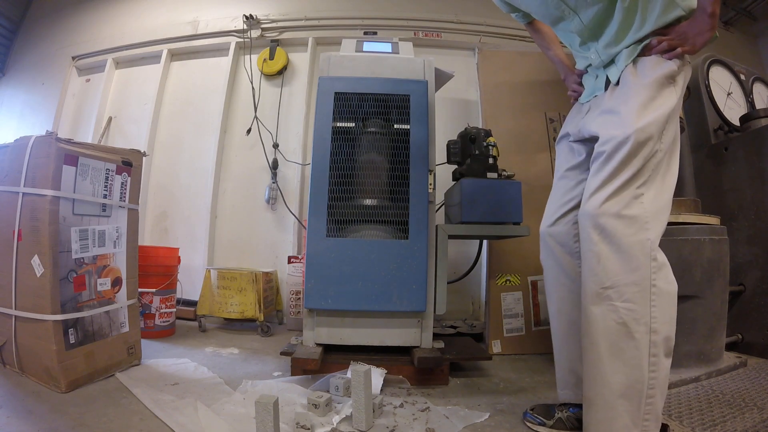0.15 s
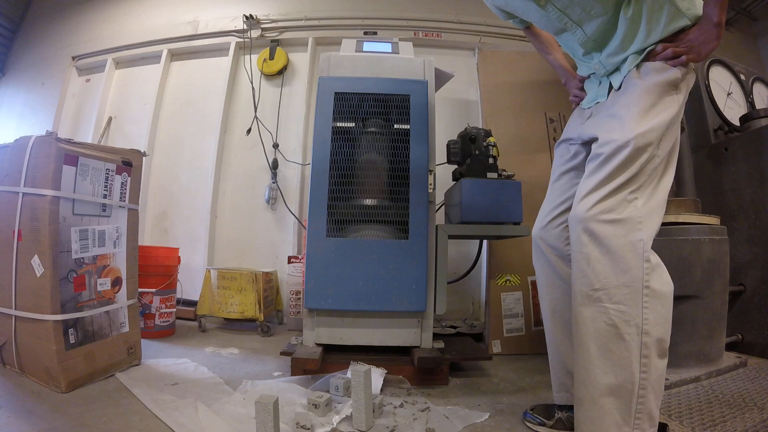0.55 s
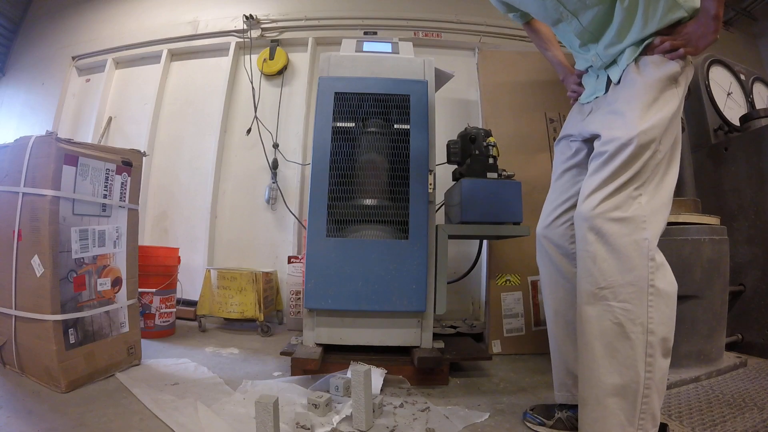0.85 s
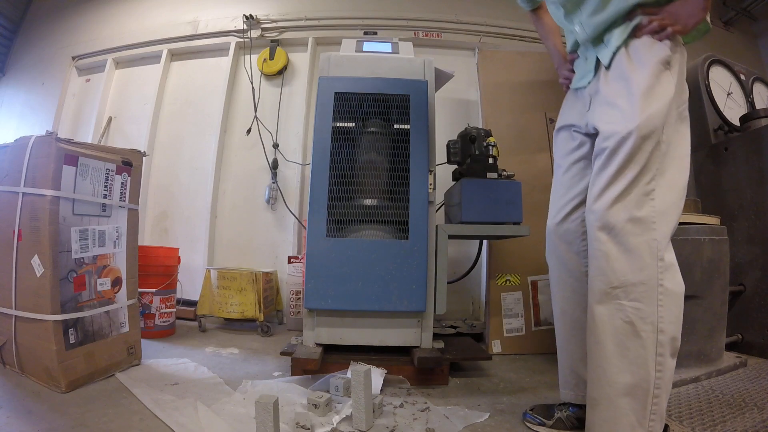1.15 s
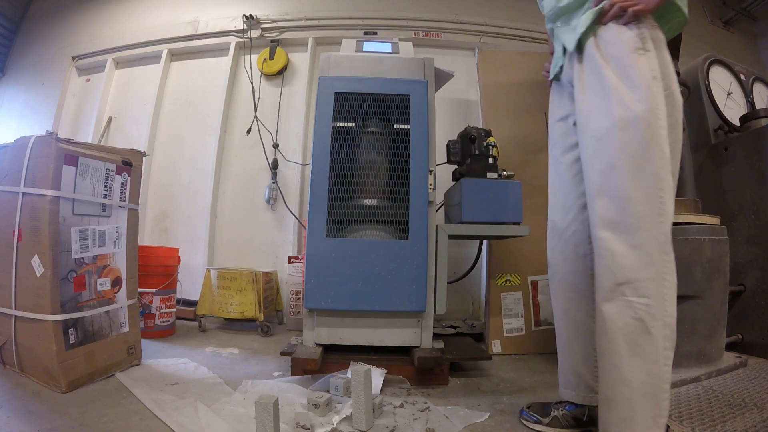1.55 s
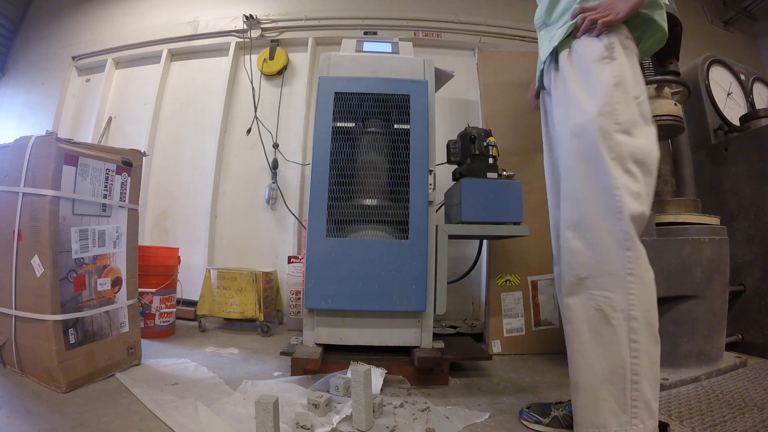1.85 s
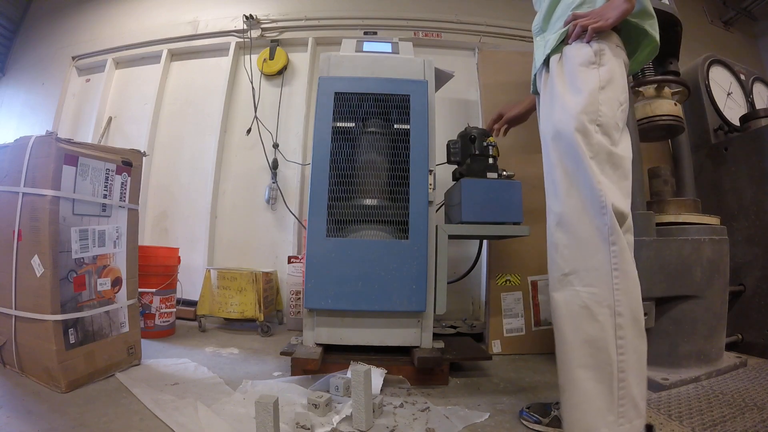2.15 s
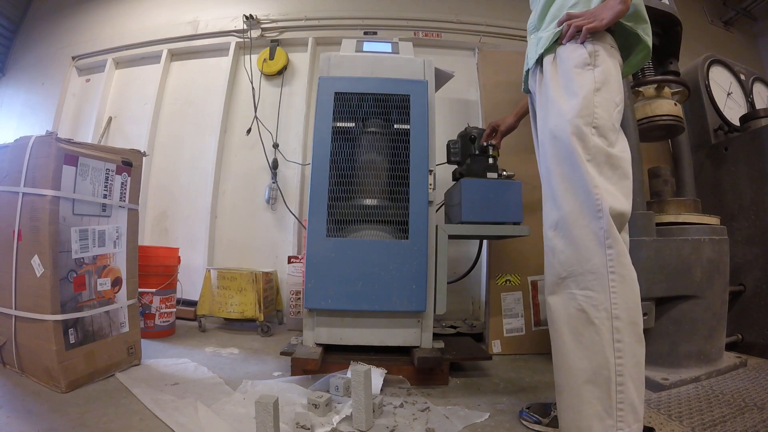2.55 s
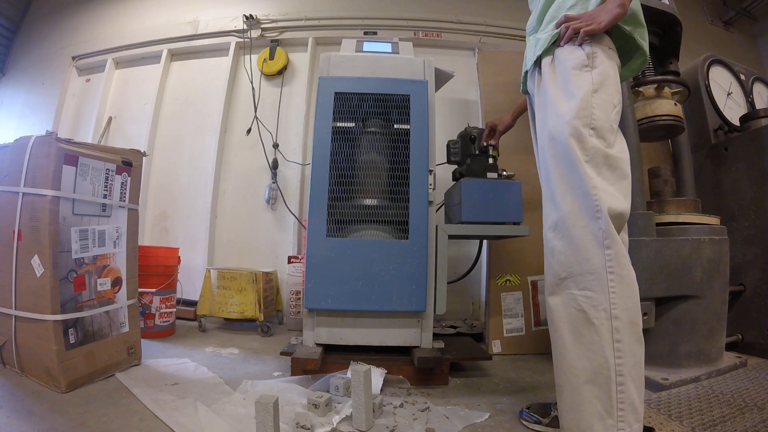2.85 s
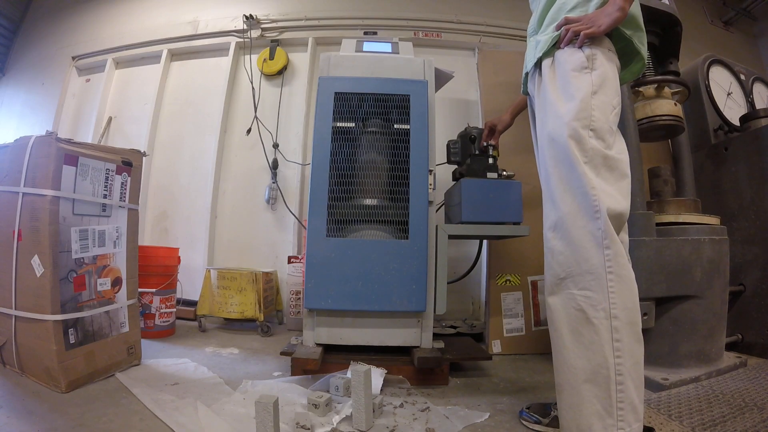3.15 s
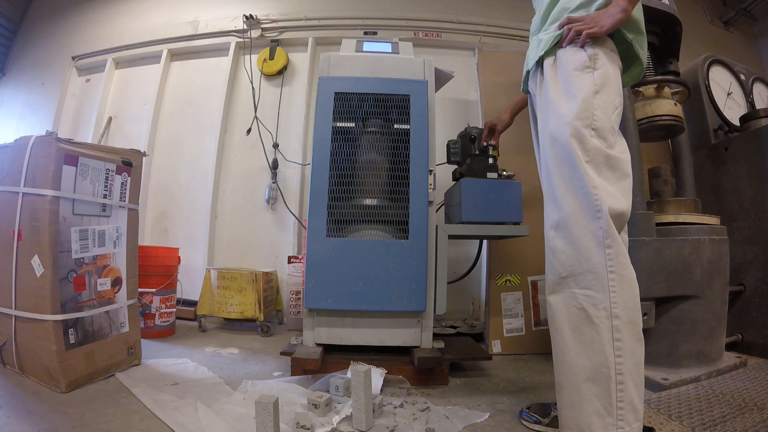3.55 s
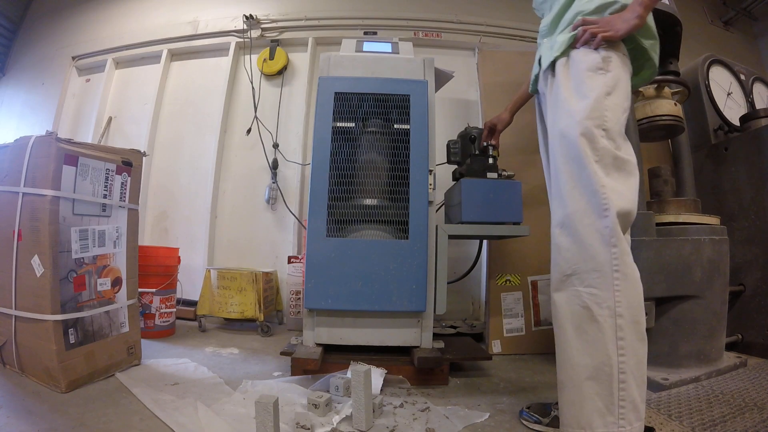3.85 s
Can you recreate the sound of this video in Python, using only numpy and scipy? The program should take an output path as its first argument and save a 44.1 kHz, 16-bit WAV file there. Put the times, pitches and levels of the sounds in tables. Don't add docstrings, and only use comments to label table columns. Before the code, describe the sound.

A concrete cylinder breaks with a sudden loud crack near three seconds, after a steady machine hum. Steel booms, chips rattle on the mesh cage, chunks thud and grit settles, heard through a closed plastic case.

```python
import sys
import numpy as np
from scipy import signal
from scipy.fft import rfft, irfft, next_fast_len
from scipy.io import wavfile
from scipy.ndimage import uniform_filter1d, map_coordinates

SR = 44100
rng = np.random.default_rng(int(sys.argv[2]) if len(sys.argv) > 2 else 0)


def nominal_scale(level):
    x = np.asarray(level, float) / 20
    return 10 ** x


def store_wav(level_fs):
    pcm = np.round(np.clip(np.atleast_2d(level_fs), -1, 1) * 32767)
    wavfile.write(sys.argv[1], SR, pcm.T.astype(np.int16))


N = 176400

# (shaft order, level [dB])
PUMP_ORDERS = [(6, -58.9), (9, -71.1), (10, -72.6), (11, -60.9), (12, -36.1), (13, -48.5), (14, -60.2),
               (15, -74.9), (16, -63.9), (17, -73.9), (18, -65.2), (19, -72.3), (20, -76.1), (22, -80.3),
               (23, -69.6), (24, -56.1), (25, -78.2), (26, -66.3), (27, -78.1), (28, -75.7), (29, -71.0),
               (30, -49.8), (31, -70.2), (32, -68.3), (33, -70.5), (34, -64.9), (35, -64.7), (36, -52.2),
               (37, -64.0), (38, -58.7), (21, -76),
               (39, -62), (40, -57.5), (41, -56.5), (42, -68), (43, -67), (44, -74), (45, -67), (46, -73),
                (47, -74.5), (48, -72.5), (54, -73), (62, -76.5), (65, -77.5), (66, -77.5), (67, -81),
                (69, -78.5), (71, -83.5), (72, -83.5), (78, -81.5), (84, -79), (96, -80), (100, -79.5),
                (101, -79), (102, -80.5), (103, -81), (104, -82), (106, -84.5), (112, -84), (114, -89.5),
                (116, -80)]
ORDERS = [(round(order), db) for order, db in PUMP_ORDERS]
# (time [s], level [dB])
STANDING_WAVE = [(0, 1.5), (1.0, 1.5), (1.6, -1), (2.2, -3), (2.95, -4), (3.3, -3), (4, -2)]
STANDING_WAVE_SHARE = {11: .5, 12: 1, 13: .7, 30: .7, 36: -.3, 40: -.6}
# (frequency [Hz], level [dB])
WEAK_ORDERS = [(30, -77.5), (600, -82), (1200, -73.5), (1600, -94.5), (2600, -92), (4000, -99),
               (9000, -103), (13000, -115)]
# (frequency [Hz], level [dB])
MAINS = [(119.95, -55), (239.9, -52.5)]
# (frequency [Hz], level [dB per Hz])
AIR = [(40, -0.5), (150, -13), (480, -14), (650, -21), (1150, -16.5), (1600, -26.5), (4000, -36.5),
       (13000, -48)]
# (frequency [Hz], width [Hz], level [dB])
DUCT = [(40, 14, -1.5)]
# (frequency [Hz], level [dB], 60 dB decay [s])
VALVE = [(3160, -56, 0.028), (3440, -51, 0.027)]
# (frequency [Hz], level [dB], 60 dB decay [s])
FRAME = [(59, -11, 0.17), (99, -6.5, 0.1), (222, -1.5, 0.093), (295, -7.5, 0.12), (371, 5, 0.046),
         (557.5, -12, 0.25), (660, 3.5, 0.06), (840, 2, 0.067), (1036, -5, 0.11), (1150, 2, 0.047)]
# (frequency [Hz], level [dB], 60 dB decay [s])
PLATEN_PING = [(4480, -50, .2), (13000, -46, .16), (13030, -52, .2)]
# (frequency [Hz], level [dB per Hz])
GRIT = [(40, -28.5), (200, 0), (450, -3), (750, -5.5), (1200, -8), (1600, -14), (2800, -24), (13500, -31.5)]
# (time [s], level [dB])
SPRAY = [
    (2.988, -25.5),
    (3.04, -27),
    (3.15, -23),
    (3.24, -25.5),
    (3.3, -36.5),
    (3.45, -40.5),
    (3.6, -43),
    (3.78, -57),
    (4, -81),
]
# (frequency [Hz], width [Hz], level [dB])
MESH = [(843, 25, 6.5), (1100, 130, 3), (1170, 97, 5.5), (1730, 120, 0.5), (1980, 160, -1.5),
        (3300, 660, -2.5), (4490, 400, -4.5), (13200, 300, 0.5)]
# (frequency [Hz], width [Hz], level [dB])
SILL = [(561, 33, 5), (1032, 55, 8.5), (1130, 54, 8), (1233, 45, 7), (1280, 53, 5.5), (1386, 79, 3.5),
        (1900, 420, 2.5), (3300, 960, 0), (4540, 630, -1.5), (7700, 740, -6)]
# (frequency [Hz], width [Hz], depth [0-1], duration [s])
DULL_DUST = (9100, 2200, 0.82, 0.048)
# (time [s], level [dB], hardness [0-1], main mode [Hz])
THUDS = [
    (2.999, -15.5, 0.96, 210.1),
    (3.007, -11, 0.93, 204),
    (3.063, -12.5, 0.79, 208.2),
    (3.086, -27, 1, 214.4),
    (3.106, -29, 1, 211),
    (3.177, -16.5, 0.08, 207.5),
    (3.207, -18, 0.03, 211.5),
    (3.259, -28, 0.02, 199),
    (3.293, -27, 0.3, 212),
    (3.361, -38, 0.8, 208),
]
# (frequency [Hz], level [dB], 60 dB decay [s])
PLATEN = [(97.6, -25, 0.16), (176, -15, 0.13), (215, -0.5, 0.15), (231, -11.5, 0.15), (315.3, -1.5, 0.14),
          (579, -9.5, 0.13), (796, -5.5, 0.046), (1070, -30, 0.065)]
# (time [s], level [dB])
BOOMS = [
    (3.166, -38.5),
    (3.366, -38.5),
    (3.418, -51),
    (3.553, -51),
]
# (frequency [Hz], level [dB], 60 dB decay [s])
PAN = [(46.6, 2, 0.21), (73.5, 1, .2), (100.2, 10.5, 0.22), (116.5, -2, 0.15)]
# (time [s], level [dB])
TICKS = [
    (3.445, -53),
    (3.555, -52),
    (3.601, -54),
    (3.64, -52),
]
# (frequency [Hz], 60 dB decay [s])
ROOM = [(60, 1), (300, 0.61), (1500, 0.93), (6000, 0.53), (13000, 0.41)]
# (frequency [Hz], width [Hz], level [dB])
CASE = [(3335, 316, 3), (5070, 1450, -2), (6400, 550, -9), (7570, 870, -3.5), (13500, 320, -3)]
# (frequency [Hz], threshold [standard deviations])
TREBLE_LOSS = [(8500, -3), (10000, -.5), (11000, .1), (12600, .1), (13000, 1.8), (13700, 3.2)]

SHAFT_HZ, FREED_HZ, FREED_S = 29.6, .08, .15
PISTONS, LOOSE_TURNS, LOOSE_DB, LOOSE_PER_S = 6, .1, 1.4, 8
SWAY_DB, SWAYS_PER_S = -0.8, 7
WEAK_SCATTER_DB, WEAK_TOP_HZ = 3, 13800
AIR_DB = -49
TAP_S, SNAP_S = 2.297, 2.9877
SNAP_DB, SNAP_RISE_S = -12, .0006
FLIP_HZ = 450
LATE_HZ, LATE_S = 800, .009
PULL_DB, PULL_S = -12, .0011
CRACK_DB, CRACK_S = -47.5, .15
CLICK_DB, CLICK_S = -39, .01
CHIPS_PER_S, CHIP_SPREAD_DB = 2200, 2
CHIP_HZ, CHIP_OCTAVES, CHIP_CYCLES, CHIP_SHARE = 3500, 1.3, 30, .5
FALL_S, FALL_SPAN_S = 3.16, 0.035
PLATEN_HZ, HARD_HZ = 213, 260
WET_DB = -6
LOW_CUT_HZ, ROLL_HZ = 18, 13700
RESCUE_DB, RESCUE_SLOPE = 21, .24


def unit(x):
    return x / np.sqrt(np.mean(x ** 2) + 1e-20)


def along(points, hz):
    f, value = np.transpose(points)
    return np.interp(np.log(hz + 1), np.log(f + 1), value)


def curve(rows):
    return np.interp(np.arange(N) / SR, *np.transpose(rows))


def wobble(rate):
    return map_coordinates(rng.standard_normal(200), [np.arange(N) * min(rate, 45) / SR])


def filtered(x, response):
    size = next_fast_len(N + SR // 2)
    return irfft(rfft(x, size) * response(np.fft.rfftfreq(size, 1 / SR)), size)[..., :N]


def peaks(table):
    return lambda f: 1 + sum(nominal_scale(db) * 1j * f * width / (hz * hz - f * f + 1j * f * width)
                             for hz, width, db in table)


def add(x, s, sound):
    i = round(s * SR)
    x[i:i + len(sound)] += sound[:N - i]


def ring(modes, attack_s, gain=lambda hz: 1, scatter_db=2):
    t = np.arange(SR // 2) / SR
    total = np.zeros(len(t))
    for hz, db, t60 in modes:
        fade = nominal_scale(db + scatter_db * rng.standard_normal() - 60 * t / t60)
        total += gain(hz) * fade * np.sin(2 * np.pi * hz * t)
    return total * (1 - np.exp(-t / attack_s)) ** 2


def noise_burst(db, t60, rise_s=0):
    t = np.arange(SR // 10) / SR
    rise = np.minimum(t / rise_s, 1) if rise_s else 1
    return nominal_scale(db - 60 * t / t60) * rise * rng.standard_normal(len(t))


def stone_colour(x):
    return filtered(x, lambda f: nominal_scale(along(GRIT, f) + 24))


def strong_tones(turns):
    total, standing_db = np.zeros(N), curve(STANDING_WAVE)
    for order, db in ORDERS:
        loose = order % PISTONS > 0
        sway_share = 0.38 if order == 12 else 1
        sway_db = SWAY_DB * wobble(SWAYS_PER_S) * sway_share
        level_db = db + sway_db + standing_db * STANDING_WAVE_SHARE.get(order, 0)
        level_db = level_db + LOOSE_DB * wobble(LOOSE_PER_S) * loose
        drift = (rng.random() + LOOSE_TURNS * wobble(LOOSE_PER_S)) * loose
        total += nominal_scale(level_db) * np.sin(2 * np.pi * (order * turns + drift))
    return total


def weak_tones(turns):
    size = 4096
    order = np.arange(size // 2 + 1)
    hz = order * SHAFT_HZ
    level = nominal_scale(along(WEAK_ORDERS, hz) + WEAK_SCATTER_DB * rng.standard_normal(len(order)))
    level = level * (hz < WEAK_TOP_HZ) * (order > 0)
    level[[k for k, _ in ORDERS]] = 0
    phase = np.exp(2j * np.pi * rng.random((3, len(order))))
    shapes = irfft(level * phase, size) * size / 2
    play = [np.interp(turns % 1 * size, np.arange(size), s, period=size) for s in shapes]
    return play[0] + 0.36 * (wobble(0.65) * play[1] + wobble(1.3) * play[2])


def pump():
    freed = np.clip((np.arange(N) / SR - SNAP_S) / FREED_S, 0, 1)
    turns = np.cumsum(SHAFT_HZ + FREED_HZ * freed + 0.0041 * wobble(3)) / SR
    return np.sqrt(2) * (strong_tones(turns) + weak_tones(turns))


def mains_buzz():
    t = np.arange(N) / SR
    return np.sqrt(2) * sum(nominal_scale(db + 0.44 * wobble(7.1)) * np.sin(2 * np.pi * (hz * t + rng.random()))
                            for hz, db in MAINS)


def air():
    noise = filtered(rng.standard_normal(N), lambda f: nominal_scale(along(AIR, f)) * peaks(DUCT)(f))
    return nominal_scale(AIR_DB + 0.16 * wobble(3.4)) * unit(noise)


def valve_tap():
    x = np.zeros(N)
    add(x, TAP_S, ring(VALVE, 0.0011))
    return x


def snap():
    x, crack = np.zeros(N), np.zeros(N)
    add(x, SNAP_S - PULL_S / 2, -nominal_scale(PULL_DB) * np.hanning(round(2 * PULL_S * SR)))
    low = [mode for mode in FRAME if mode[0] < LATE_HZ]
    high = [mode for mode in FRAME if mode[0] >= LATE_HZ]
    low_ring = ring(low, SNAP_RISE_S, lambda hz: np.sign(FLIP_HZ - hz), scatter_db=0)
    add(x, SNAP_S, nominal_scale(SNAP_DB) * low_ring)
    add(x, SNAP_S + LATE_S, nominal_scale(SNAP_DB) * ring(high, .002, scatter_db=0))
    add(x, SNAP_S + LATE_S, ring(PLATEN_PING, .003, scatter_db=0))
    add(crack, SNAP_S, noise_burst(CRACK_DB, CRACK_S, rise_s=.002))
    add(crack, SNAP_S, noise_burst(CLICK_DB, CLICK_S, rise_s=.001))
    return x + stone_colour(crack)


def chips():
    draw = rng.random((round(CHIPS_PER_S * (N / SR - 2.98)), 4))
    start = (SNAP_S * SR + draw[:, 0] * (N - SNAP_S * SR)).astype(int)
    octaves = CHIP_OCTAVES * 2 * (draw[:, 1] + draw[:, 2] - 1)
    hz = np.clip(CHIP_HZ * 2 ** octaves, 300, 13500)[:, None]
    n = np.arange(600)
    cycles = n * hz / SR
    size_db = -CHIP_SPREAD_DB * np.log(draw[:, 3:] + 1e-3)
    fade = nominal_scale(size_db - 60 * cycles / CHIP_CYCLES / 2)
    tone = fade * np.sqrt(hz) * np.minimum(cycles / 3, 1) * np.sin(2 * np.pi * cycles)
    x = np.bincount((start[:, None] + n).ravel(), tone.ravel(), N + len(n))[:N]
    return x / np.std(x[start.min():])


def spray():
    t = np.arange(N) / SR
    drive = CHIP_SHARE * chips() + rng.standard_normal(N)
    after = t > SNAP_S
    lumpy = drive * nominal_scale(curve(SPRAY) + .9 * wobble(40)) * after

    def on_cage(x, table):
        return filtered(x, lambda f: nominal_scale(along(GRIT, f)) * peaks(table)(f))

    fallen = np.pi / 4 * (1 + np.tanh((t - FALL_S) / FALL_SPAN_S))
    x = np.cos(fallen) ** 2 * on_cage(lumpy, MESH) + np.sin(fallen) ** 2 * on_cage(lumpy, SILL)
    x = x / np.std(on_cage(drive, SILL)[after])
    centre_hz, width_hz, depth, lasts_s = DULL_DUST
    early = depth * np.exp(-np.maximum(t - SNAP_S, 0) ** 2 / lasts_s ** 2)
    return x - early * filtered(x, lambda f: np.exp(-((f - centre_hz) / width_hz) ** 2))


def platen_thuds():
    x = np.zeros(N)
    for s, db, hard, main_hz in THUDS:
        modes = [(hz * main_hz / PLATEN_HZ, level, t60) for hz, level, t60 in PLATEN]
        blow = ring(modes, 0.0012, lambda hz: np.clip(hard if hz > HARD_HZ else 1 - hard, .03, 1))
        add(x, s, nominal_scale(db) * blow)
    return x


def pan_booms():
    x = np.zeros(N)
    for s, db in BOOMS:
        add(x, s, nominal_scale(db) * ring(PAN, 0.0025))
    return x


def stone_ticks():
    x = np.zeros(N)
    for s, db in TICKS:
        add(x, s, noise_burst(db, .008))
    return stone_colour(x)


def room(x):
    hz, t, z = signal.stft(rng.standard_normal(SR), SR, nperseg=256)
    tail = signal.istft(z * nominal_scale(-60 * t / along(ROOM, hz)[:, None]), SR, nperseg=256)[1]
    delayed = np.pad(x, (300, 0))
    return signal.fftconvolve(delayed, tail / np.linalg.norm(tail))[:N]


def microphone_case(x):
    def response(f):
        low_cut = (f / (f - 1j * LOW_CUT_HZ)) ** 2
        return peaks(CASE)(f) * low_cut / np.sqrt(1 + (f / ROLL_HZ) ** 40)
    return filtered(x, response)


def patchy_treble(x):
    hz, _, z = signal.stft(x, SR, nperseg=2048)
    patches = uniform_filter1d(rng.standard_normal(z.shape), 9, axis=-2)
    field = unit(patches + .2 * rng.standard_normal(z.shape[-1]))
    treble_power = np.mean(abs(z[:, hz > 9000]) ** 2, axis=1, keepdims=True)
    treble_db = 10 * np.log10(treble_power + 1e-20)
    rescue = RESCUE_SLOPE * np.maximum(treble_db - np.median(treble_db) - RESCUE_DB, 0)
    kept = field + rescue > along(TREBLE_LOSS, hz)[:, None]
    return signal.istft(z * kept, SR, nperseg=2048)[1][:, :N]


def scene():
    steady = pump() + mains_buzz() + air()
    burst = valve_tap() + snap() + spray() + platen_thuds() + pan_booms() + stone_ticks()
    return (steady + burst + nominal_scale(WET_DB) * room(burst))[None]


def band_limit(x):
    return signal.sosfilt(signal.butter(12, 13870, fs=SR, output="sos"), x)


def record(dry):
    mix = patchy_treble(microphone_case(dry))
    return band_limit(mix)


dry = scene()
out = record(dry)
store_wav(out)
```